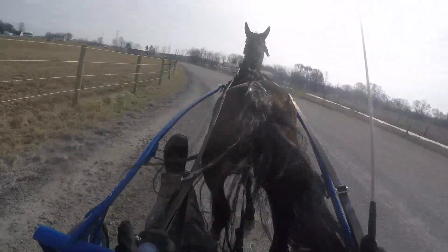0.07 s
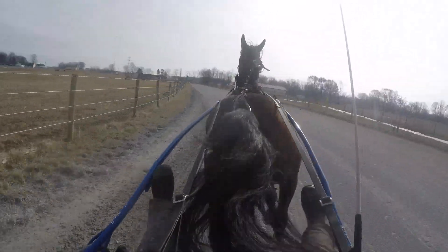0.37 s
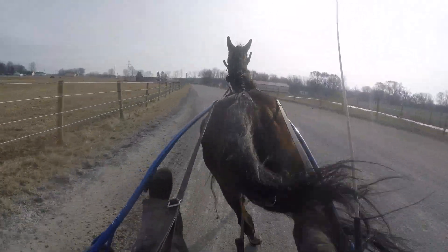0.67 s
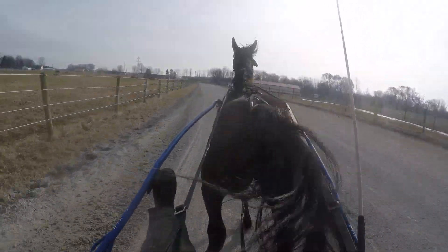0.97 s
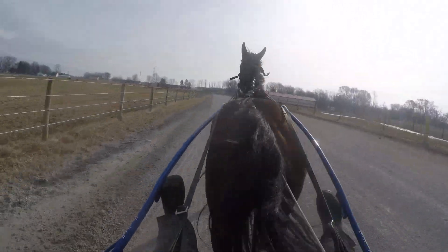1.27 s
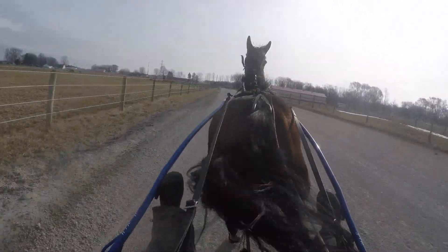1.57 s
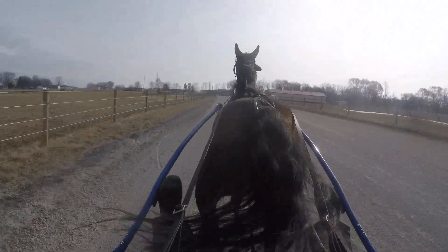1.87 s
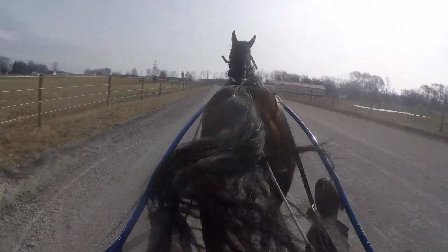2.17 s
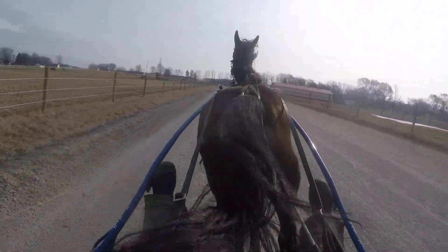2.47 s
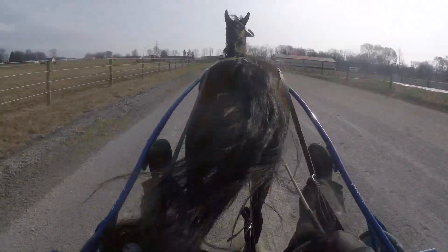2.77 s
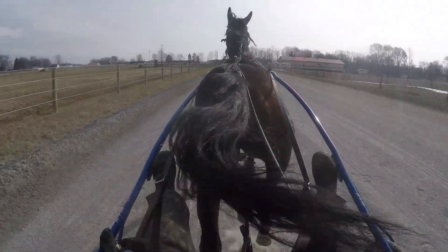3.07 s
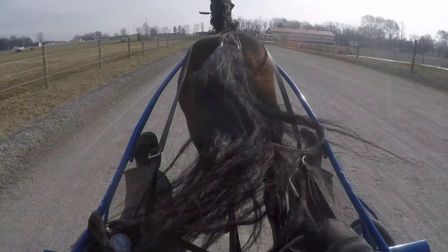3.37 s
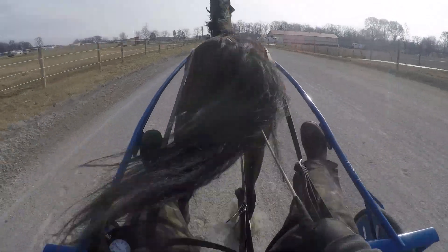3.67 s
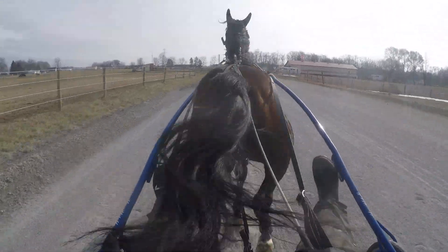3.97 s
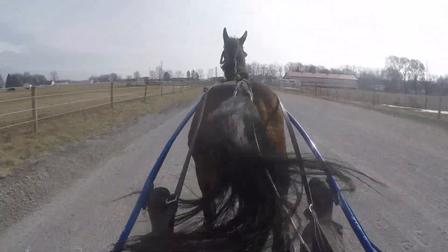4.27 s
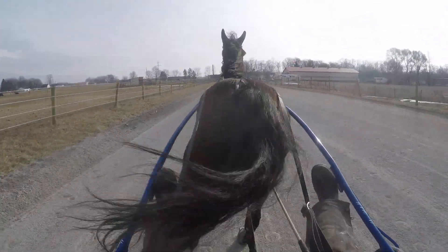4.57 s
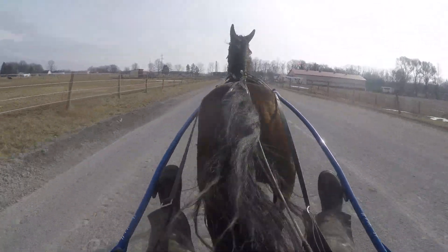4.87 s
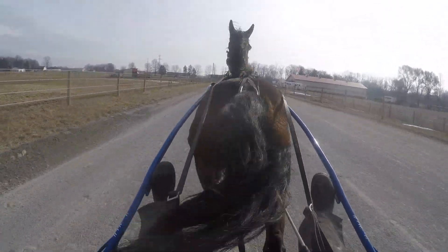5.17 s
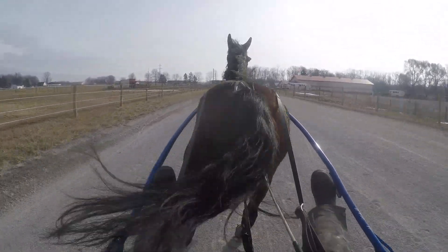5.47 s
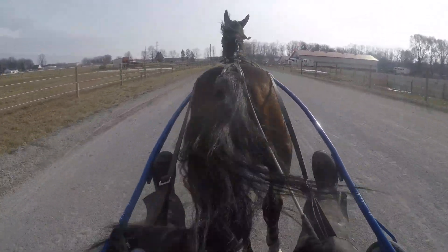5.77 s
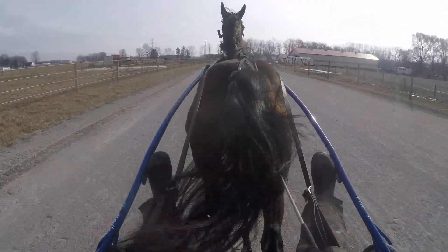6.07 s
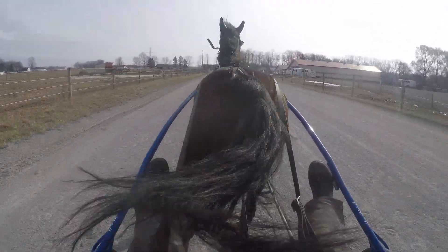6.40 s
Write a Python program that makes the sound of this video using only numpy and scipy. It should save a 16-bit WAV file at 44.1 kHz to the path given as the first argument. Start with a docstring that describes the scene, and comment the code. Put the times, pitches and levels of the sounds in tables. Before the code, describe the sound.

A trotting horse pulls a cart over crunching grit, with wind buffeting the microphone and stones cracking sharply against it.

```python
"""Grit crunches in time with a trot as a horse pulls a light two-wheeled cart along a track.
Tyres crush the grit and hooves scuff it, all heard through the plastic case of a camera on the cart.
Flung stones crack against the case; the hardest makes the gain control duck for about a second,
while a thin whistle wavers. Underneath, a headwind buffets the microphone."""
import sys
import numpy as np
from scipy import signal
from scipy.fft import rfft, irfft, next_fast_len
from scipy.io import wavfile
from scipy.ndimage import map_coordinates

SR = 44100
rng = np.random.default_rng(int(sys.argv[2]) if len(sys.argv) > 2 else 0)


def generate_wav(sig):
    """Save sig (samples, or channels by samples) to the path in sys.argv[1] as 16-bit PCM at SR."""
    pcm = np.round(np.clip(np.atleast_2d(sig).T, -1, 1) * 32767).astype(np.int16)
    wavfile.write(sys.argv[1], SR, pcm)


N = 288414

# looser and firmer stretches of track: (time [s], relative crunch level [dB])
TRACK_CRUNCH = [(0.0, -21), (0.08, -34), (0.34, -27), (1.67, -29.0), (1.78, -21), (1.95, -28.5),
                (2.09, -26.5), (2.23, -29.5), (2.4, -24), (2.5, -29.5), (2.64, -21.5), (2.86, -33.5),
                (3.09, -29), (3.79, -31), (4.04, -25.5), (5.52, -26), (5.62, -27.5), (6.54, -30)]
# bumps that lift the tyres off the grit: (time [s], half-length [s], crunch drop [dB])
TRACK_BUMPS = [(0.672, 0.025, 7), (1.107, 0.016, 6), (2.255, 0.012, 6), (2.847, 0.011, 3.5),
               (3.77, 0.044, 6.5), (3.947, 0.012, 9), (4.177, 0.015, 9), (4.894, 0.017, 5),
               (5.232, 0.008, 11), (5.633, 0.023, 8), (5.82, 0.018, 4.5)]
# hooves that scuff harder than the rest: (time [s], relative strength [dB], rise [s])
HOOF_SCUFFS = [(0.308, -10, .004), (0.346, -9.5, .001), (0.41, -9, .01), (0.715, -9, .015),
               (0.90, -9, .015), (1.025, -8, .012), (1.409, -10, .001), (1.565, -11, .001),
               (1.972, -7.5, .001), (2.037, -7.5, .002), (2.075, -5, .012), (2.295, -3.5, .008),
               (2.385, -7, .001), (2.67, -6, .015), (2.860, -12.5, .001), (3.069, -9.5, .001),
               (3.137, -8.5, .001), (3.40, -9, .015), (3.66, -10, .015), (4.32, -7, .012),
               (4.526, -5, .001), (4.775, -4, .018), (5.147, -6, .002), (5.27, -6, .01), (5.395, -6, .015),
               (5.435, -5, .012), (5.495, -6, .008), (5.86, -4, .012), (5.955, -7, .012)]
# broad tone of crushed grit: (frequency [Hz], spectral level [dB])
GRIT_SPECTRUM = [(100, -21.5), (350, -8.5), (700, -8), (1300, -6), (1650, -2), (2200, -3), (3300, 0.5),
                 (4300, -3), (5100, -10.5), (7000, -12.5), (8500, -17), (10000, -16), (12500, -26),
                 (15500, -33)]
# air resonances of the case: (frequency [Hz], width [Hz], boost [dB])
CASE_RESONANCES = [(1019, 82, 7.5), (1920, 250, 3), (2538, 496, 9.5), (2960, 340, 3.5), (3558, 305, 8.5),
                   (3855, 325, 9.5), (4466, 380, 4.5), (6010, 610, 9.5), (6625, 350, 8.5), (7620, 570, 3.5)]
# stones hitting the case: (time [s], relative level [dB], knock trim [dB], top-octave trim [dB])
STONE_HITS = [(0.3070, -11, -14, 6), (0.3205, -18, -8, 2), (0.4980, 20, -12, 3.5), (0.801, 10.5, -13.5, -3),
              (0.8313, 6.5, -9, -5), (1.4100, -23, -2, -3), (2.907, -26, -14, 1), (3.138, -24, 3, -5),
              (3.6465, -28, -13.5, 4), (3.8110, -20, -10, -2), (4.2103, -2, 1.5, 3), (4.531, -19, 8, -10),
              (5.6410, -26, -16, 7), (6.0892, -4.5, -8, -2), (6.335, -24, -10, 4), (6.4650, -26, 12, -5)]
# tone of a stone's crack: (frequency [Hz], spectral level [dB])
CRACK_SPECTRUM = [(1000, -25), (4300, -15.5), (5800, -0.5), (7200, -0.5), (8600, -7), (12000, -9),
                  (15000, -18.5), (18000, -34)]
# modes of the struck case: (frequency [Hz], relative level [dB], t60 [s])
KNOCK_MODES = [(1200, -7, 0.012), (1654, -2.5, 0.011), (2430, -2, 0.0057), (2810, -2.5, 0.012),
               (3330, -3, 0.0076), (3920, -8, .016), (5770, -6, 0.011), (7400, -27, 0.043)]
# gusts of headwind: (time [s], relative buffet level [dB], relative rush level [dB])
HEADWIND = [(0.0, -16.1, -35.5), (0.89, -24, -39), (0.97, -20, -37.5), (1.28, -28, -37.5),
            (1.73, -16.0, -35.5), (2.14, -22, -34.5), (2.37, -18, -35), (2.95, -23.5, -39),
            (3.06, -19, -35.5), (3.51, -24.5, -33), (3.59, -18, -38.5), (4.31, -21.4, -34.5),
            (4.59, -16.5, -35.5), (4.78, -20, -36), (6.16, -21, -36), (6.54, -15.5, -39)]
# rumble of slow eddies: (frequency [Hz], spectral level [dB])
BUFFET_SPECTRUM = [(6, -22.5), (14, -4), (26, 2), (38, -4), (60, -9.5), (82, -14.5), (115, -25.5),
                   (250, -46.5), (1000, -120)]
# rush of small eddies: (frequency [Hz], spectral level [dB])
RUSH_SPECTRUM = [(50, -16), (110, -0.5), (170, -3), (300, -8), (600, -17.5), (1000, -14), (1600, -16),
                 (3000, -15.5), (6000, -77), (14000, -120)]
# contour of the thin whistle: (time [s], pitch [Hz], relative level [dB])
WHISTLE_CONTOUR = [(0.51, 9700, -49), (0.55, 9700, -21.5), (0.65, 9800, -29), (0.76, 9900, -33.5),
                   (0.87, 10000, -26), (0.95, 9500, -33), (1.01, 10700, -34), (1.06, 10000, -83)]

STEP_HZ, FIRST_FLIGHT_S = 4.4, 0.14  # the trot: two steps to a stride, a short flight between steps


def wheels(clumps_per_s=130, crumble_s=0.005, clump_size=0.45, trim_db=1.1):
    """Tyres break clumps of grit that give way at once and crumble; the crunch surges with each step."""
    track_db, = curves(TRACK_CRUNCH)
    pull_db = -0.25 * stride(peak_s=0.42)  # one pair of legs pulls harder
    trot_db = pull_db - tyre_lift_db() + 0.78 * wobble(28)
    breaks = (rng.random(N) < clumps_per_s / SR) * rng.uniform(0.59, 1.85, N)
    clumps = signal.lfilter([1], [1, -np.exp(-1 / (crumble_s * SR))], breaks)
    force = unit((1 + clump_size * clumps) * amp(wobble(240)))
    return crunch(amp(track_db + trot_db + trim_db) * force, flicker_db=1.63)


def tyre_lift_db(flight_half_s=0.044, flight_db=3.5, unload_s=0.0088, unload_db=1.5):
    """The crunch drops as the tyres lose weight: between steps, over bumps and before hard footfalls."""
    t = np.arange(N) / SR
    steps = (t - FIRST_FLIGHT_S) * STEP_HZ
    flights = bell((steps - np.round(steps)) / STEP_HZ, flight_half_s)
    bumps_db = sum(db * bell(t - s, half_s) for s, half_s, db in TRACK_BUMPS)
    footfalls = sum(bell(t - s + unload_s, unload_s) for s, _, _ in HOOF_SCUFFS)
    return flight_db * flights + bumps_db + unload_db * footfalls


def hooves(slide_t60=0.13, strike_t60=0.017, trim_db=-12.5):
    """Each hoof strikes the grit or sinks in softly, then slides to rest."""
    force, t = np.zeros(N), np.arange(SR // 4) / SR
    scuff = amp(-60 * t / slide_t60) + amp(-60 * t / strike_t60)
    for s, db, rise_s in HOOF_SCUFFS:
        add(force, s, amp(db + trim_db) * scuff * (1 - np.exp(-t / rise_s)))
    return crunch(force, flicker_db=2.0)


def crunch(force, flicker_db, crossover_hz=5000):
    """Grit crushed under a varying force rings the case; sharper and duller patches pass by."""
    lowpass = signal.butter(2, crossover_hz, 'low', fs=SR)
    highpass = signal.butter(2, crossover_hz, 'high', fs=SR)
    coarse = signal.lfilter(*lowpass, grains(per_s=4000, spread_db=5.5, sand_db=-3.5))
    sharpness = amp(flicker_db * (wobble(22) + wobble(110) - 1.09))
    fine = signal.lfilter(*highpass, grains(per_s=1500, spread_db=4.5, sand_db=-1)) * sharpness
    ring = coloured(signal.unit_impulse(SR // 20), grit_through_case)
    return signal.fftconvolve(force * unit(coarse + fine), ring / np.linalg.norm(ring))[:N]


def grains(per_s, spread_db, sand_db):
    """Tiny fractures of uneven size over a hiss of fine sand, rms 1."""
    sizes = amp(spread_db * np.clip(rng.standard_normal(N), -2, 2)) * rng.choice([-1, 1], N)
    fractures = unit(sizes * (rng.random(N) < per_s / SR))
    return unit(fractures + amp(sand_db) * rng.standard_normal(N))


def grit_through_case(hz):
    """EQ curve in dB: the air in the case adds resonant peaks to the broad tone of the grit."""
    peaks = sum((amp(db) ** 2 - 1) / (1 + (2 * (hz - centre) / width) ** 2) ** 2
                for centre, width, db in CASE_RESONANCES)
    return along(GRIT_SPECTRUM, hz) + 10 * np.log10(1 + peaks)


def stones(crack_t60=0.0053, crack_trim_db=-4.5, knock_trim_db=-2, knock_rise_s=0.00037):
    """Each stone makes a bright crack on the case and knocks its modes into ringing."""
    track, t = np.zeros(N), np.arange(SR // 10) / SR
    contact = amp(-60 * t / crack_t60)
    for s, db, knock_db, edge_db in STONE_HITS:
        shelf = [(9000, 0), (12000, edge_db)]  # small, hard stones are sharper
        burst = contact * rng.standard_normal(len(t))
        crack = coloured(burst, lambda hz: along(CRACK_SPECTRUM, hz) + along(shelf, hz))
        crack *= amp(crack_trim_db) * np.linalg.norm(contact) / np.linalg.norm(crack)
        ring = sum(amp(mode_db + rng.normal(0, 1) - 60 * t / t60)
                   * np.sin(2 * np.pi * (hz * t + rng.random())) for hz, mode_db, t60 in KNOCK_MODES)
        knock = amp(knock_db + knock_trim_db) * ring * (1 - np.exp(-t / knock_rise_s))
        add(track, s, amp(db) * (crack + knock))
    return track


def case_thump(at_s=0.5, gain_db=19, push_s=0.0065, rise_s=0.0015):
    """The case wall gives under the hardest stone and shoves the air inside: pressure, then suction."""
    track, t = np.zeros(N), np.arange(SR // 10) / SR
    push = (1 - t / push_s) * np.exp(-t / push_s) * (1 - np.exp(-t / rise_s))
    add(track, at_s, amp(gain_db) * push)
    return track


def wind(buffet_trim_db=1.54, rush_trim_db=2.0):
    """Slow eddies shake the microphone; smaller ones rush over the case in flurries."""
    buffet_db, rush_db = curves(HEADWIND)
    sway_db = 0.1 * stride(peak_s=0.051)  # the cart sways into the wind once a stride
    buffet = amp(buffet_db + buffet_trim_db + sway_db) * noise(BUFFET_SPECTRUM)
    flurries = unit(amp(2.06 * wobble(50) + 1.6 * wobble(9)) * noise(RUSH_SPECTRUM))
    return buffet + amp(rush_db + rush_trim_db) * flurries


def whistle(half_width_hz=720, waver_hz=110, tone_db=-7, trim_db=-6):
    """A thin tone inside a band of hiss wavers in pitch, with fainter ones below and above it."""
    pitch_hz, db = curves(WHISTLE_CONTOUR)
    lowpass = signal.butter(4, half_width_hz, fs=SR, output='sos')
    hiss = unit(signal.sosfilt(lowpass, rng.standard_normal((2, N))))
    phase = 2 * np.pi * np.cumsum(pitch_hz + waver_hz * wobble(45)) / SR
    partials = np.exp(1j * phase) + amp(-11) * np.exp(0.71j * phase) + amp(-26) * np.exp(1.45j * phase)
    breathy = (hiss[0] + 1j * hiss[1] + amp(tone_db)) * partials  # centres the hiss on each partial
    return amp(db + trim_db) * unit(np.real(breathy))


def gain_control(x, threshold_db=-5, release_db_per_s=12, window_s=0.01):
    """An overload ducks the gain at once; it then creeps back up."""
    size = round(window_s * SR)
    power = signal.fftconvolve(x[0] ** 2, np.ones(size) / size)[:N]
    over_db = np.maximum(10 * np.log10(np.abs(power) + 1e-12) - threshold_db, 0)
    release_db = release_db_per_s * np.arange(N) / SR
    duck_db = np.maximum.accumulate(over_db + release_db) - release_db
    return x * amp(-duck_db)


def stride(peak_s):
    """A swing between -1 and 1, once every two steps."""
    return np.cos(np.pi * STEP_HZ * (np.arange(N) / SR - peak_s))


def bell(offset_s, half_s):
    """A bell curve of height 1 at zero offset."""
    return np.exp(-(offset_s / half_s) ** 2)


def amp(db):
    """Decibels to gain."""
    return 10 ** (np.asarray(db) / 20)


def unit(x):
    """Scale to rms 1."""
    return x / np.sqrt(np.mean(x ** 2) + 1e-20)


def along(points, hz):
    """Read an EQ curve on a log frequency axis."""
    point_hz, db = np.transpose(points)
    return np.interp(np.log(hz + 1), np.log(point_hz + 1), db)


def curves(rows):
    """An automation curve for each column after the time."""
    times, *columns = np.transpose(rows)
    return [np.interp(np.arange(N) / SR, times, column) for column in columns]


def wobble(rate):
    """A smooth random curve, rate knots a second."""
    return map_coordinates(rng.standard_normal(int(N * rate / SR) + 4), [np.arange(N) * rate / SR])


def coloured(x, shape):
    """Minimum-phase EQ whose gain in dB is shape(Hz)."""
    size = 2 * next_fast_len(len(x) // 2 + SR // 8)
    cepstrum = irfft(np.log(amp(shape(np.fft.rfftfreq(size, 1 / SR)))))
    cepstrum[1:size // 2] *= 2
    cepstrum[size // 2 + 1:] = 0
    return irfft(rfft(x, size) * np.exp(rfft(cepstrum)))[:len(x)]


def noise(spectrum):
    """Noise of rms 1 with the given spectrum."""
    return unit(coloured(rng.standard_normal(N), lambda hz: along(spectrum, hz)))


def add(track, s, sound):
    """Mix a sound into the track at time s."""
    start = max(0, round(s * SR))
    track[start:start + len(sound)] += sound[:N - start]


def scene():
    """Everything reaches one microphone on the cart."""
    return (wheels() + hooves() + wind() + stones() + case_thump() + whistle())[None]


def record(dry):
    """The gain control ducks, the hardest cracks clip, and a steep low-pass trims the top."""
    clipped = np.clip(gain_control(dry), -.96, .96)
    return signal.sosfilt(signal.ellip(10, .2, 80, 15300, fs=SR, output='sos'), clipped)


dry = scene()
out = record(dry)
generate_wav(out)
```